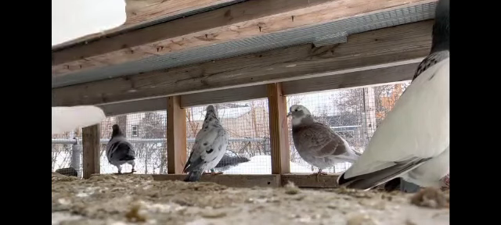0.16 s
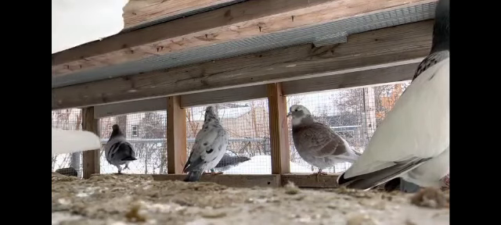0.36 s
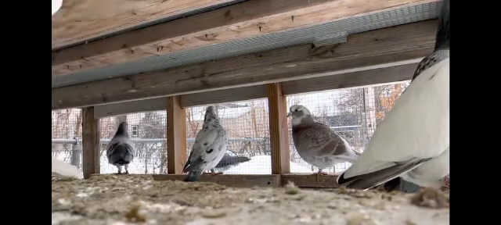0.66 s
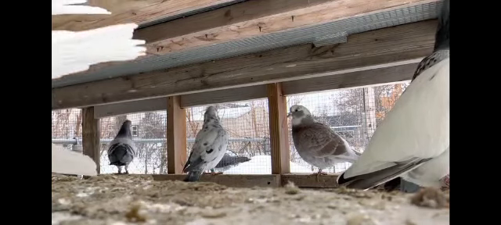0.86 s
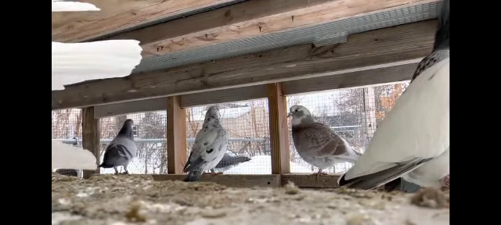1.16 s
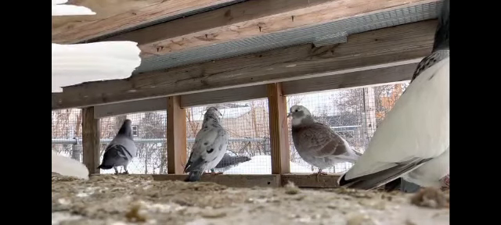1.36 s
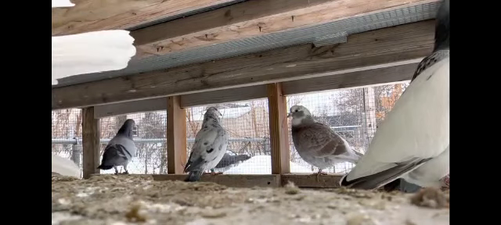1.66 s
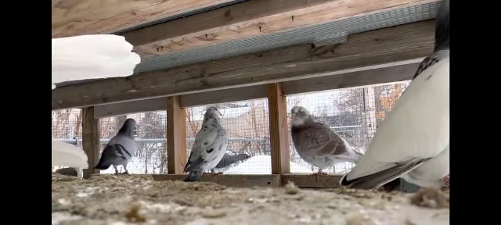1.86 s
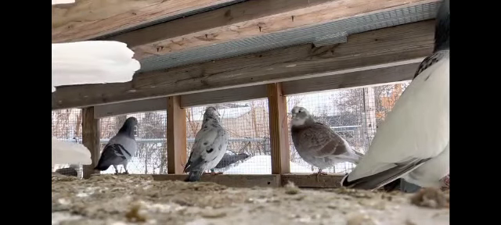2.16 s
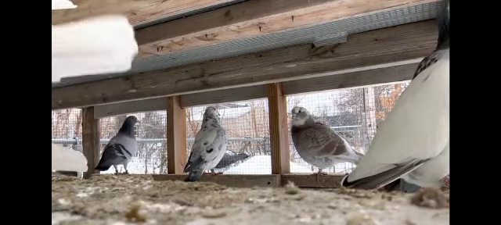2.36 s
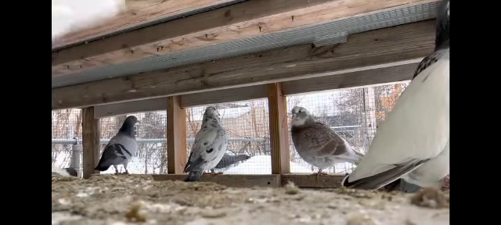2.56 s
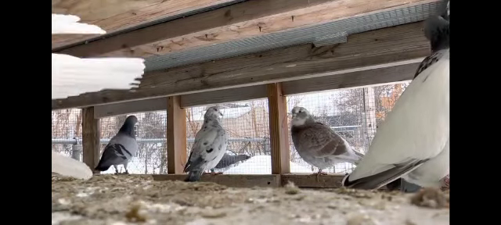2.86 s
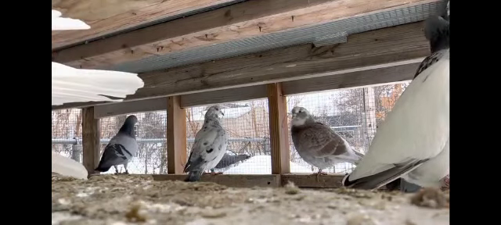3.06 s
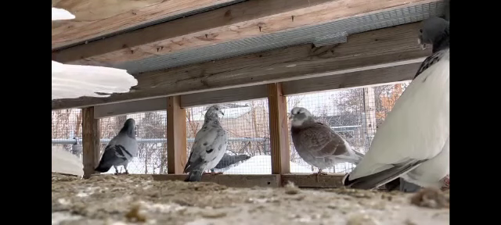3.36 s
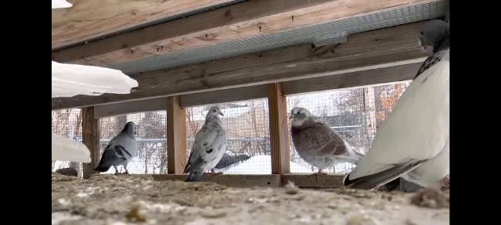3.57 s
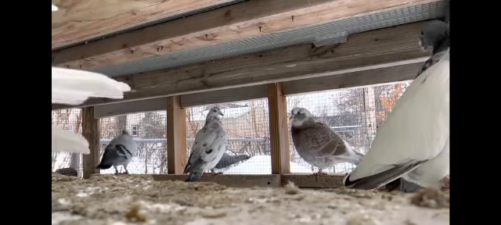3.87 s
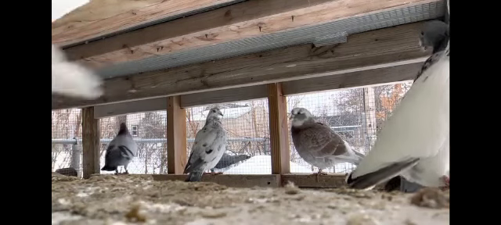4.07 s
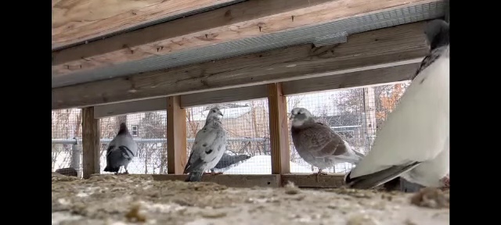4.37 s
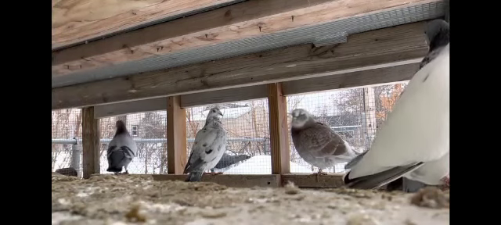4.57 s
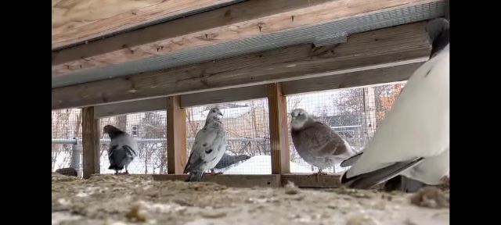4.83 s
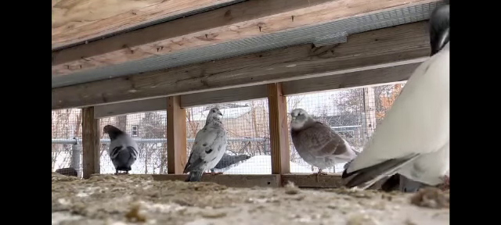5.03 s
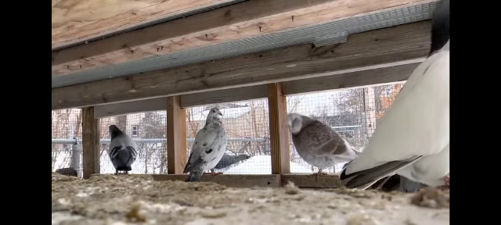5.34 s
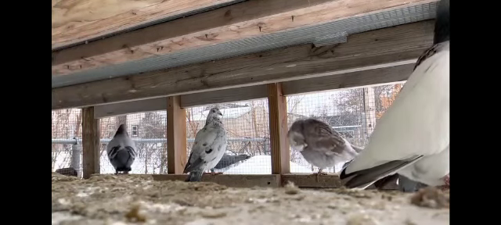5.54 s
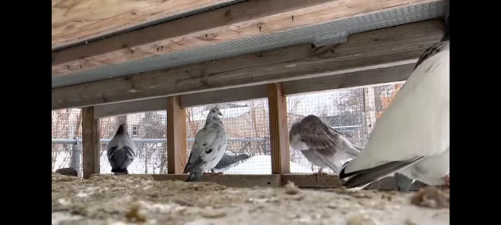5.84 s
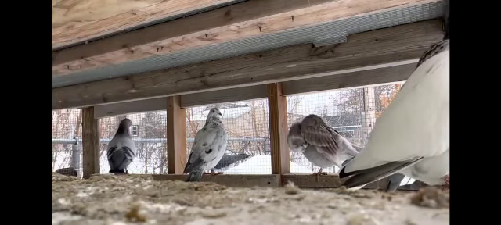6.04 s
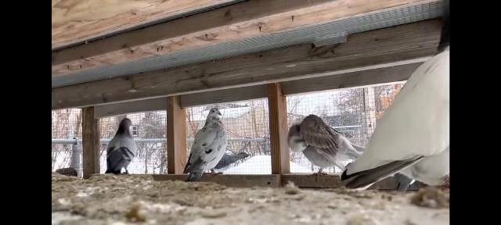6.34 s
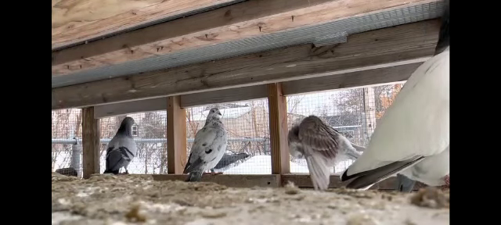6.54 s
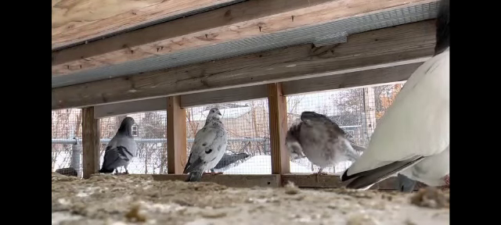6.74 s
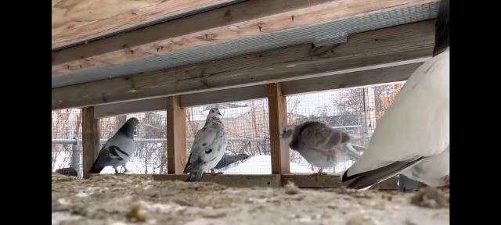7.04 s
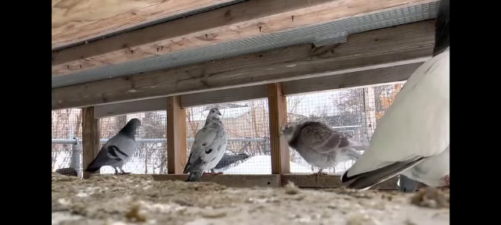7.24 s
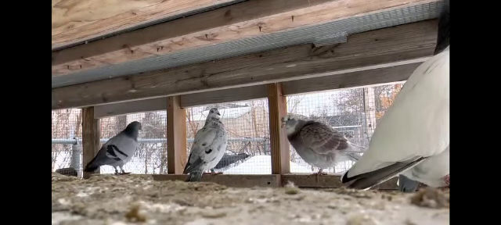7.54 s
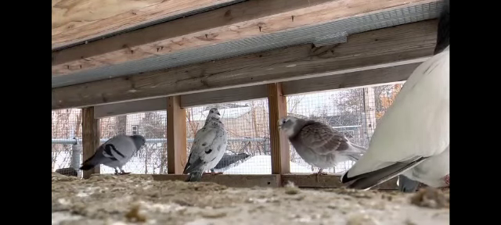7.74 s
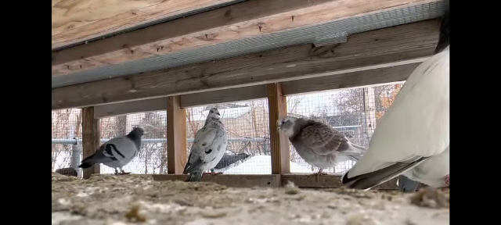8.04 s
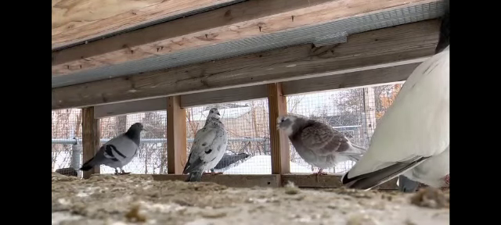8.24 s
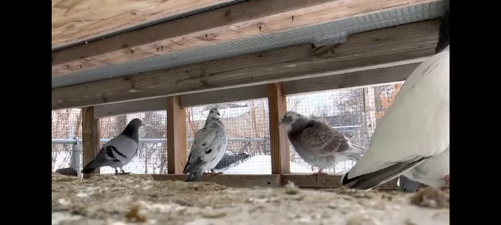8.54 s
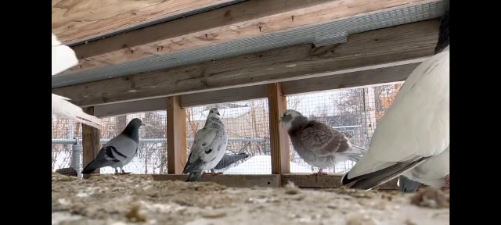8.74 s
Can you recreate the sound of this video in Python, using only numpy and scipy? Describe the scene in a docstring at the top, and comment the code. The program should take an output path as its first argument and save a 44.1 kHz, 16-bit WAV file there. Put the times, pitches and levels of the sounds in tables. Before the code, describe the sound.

Several pigeons murmur at close range, almost pure-toned hoots and warbling coos overlapping with low grunts. The calls thin out, birds land with two loud woody thumps, and wings shake in a rapid soft flutter. Sparse pecks, scratching claws and dry feather rustle follow, then a late hoot and coo with soft thuds. The room is short and woody, with a faint low outdoor rumble.

```python
"""Pigeons coo in a low wooden loft: near-pure gliding notes, short hoots, rough grunts and a low growl.
Each voice is a gliding sine with faint overtones; the growl is a train of slaps that rings the throat.
Close to the microphone, noise bursts make birds shuffle, shake their feathers, peck and scratch.
Twice one lands hard on the floor boards, which ring in decaying modes.
Wings push draughts at the microphone, and a faint outdoor rumble comes in through the wire mesh."""
import sys
import numpy as np
from scipy import signal
from scipy.fft import rfft, irfft, next_fast_len
from scipy.io import wavfile
from scipy.ndimage import uniform_filter1d, map_coordinates

SR = 44100
rng = np.random.default_rng(int(sys.argv[2]) if len(sys.argv) > 2 else 0)


def put_to_file(sound):
    """Save the sound as 16-bit audio at rate SR, in the file named by the first command-line argument."""
    columns = np.atleast_2d(sound).T  # one column per channel
    safe = np.clip(columns, -1, 1)
    whole_steps = np.round(safe * 32767)
    wavfile.write(sys.argv[1], SR, whole_steps.astype(np.int16))


N = 392490

# colour of feather hiss and of claw ticks on dry litter: frequency_hz, relative_level_db
VANES = [(760, -45.5), (1300, -4), (1410, -7), (2380, -2.5), (2590, -7), (4320, -6), (6100, -7.5),
         (7140, -5.5), (8180, -11), (10300, -3.5), (11500, -15.5), (14700, -12), (15800, -29)]


def amp(db):
    """Decibels to gain."""
    return 10 ** (np.asarray(db) / 20)


def unit(x):
    """Scale to rms 1."""
    return x / np.sqrt(np.mean(x ** 2) + 1e-20)


def along(points, hz):
    """(Hz, value) points read on a log axis."""
    f, v = np.transpose(points)
    return np.interp(np.log(hz + 1), np.log(f + 1), v)


def curves(rows, t):
    """Each column after the time, read at the times t."""
    s, *cols = np.transpose(rows)
    return [np.interp(t, s, c) for c in cols]


def wobble(rate, size):
    """A smooth random curve, rate knots a second."""
    knots = rng.standard_normal(int(size * rate / SR) + 4)
    return map_coordinates(knots, [np.arange(size) * rate / SR])


def noise(spectrum, size):
    """Coloured noise of rms 1."""
    m = next_fast_len(size + 8192)
    colour = amp(along(spectrum, np.fft.rfftfreq(m, 1 / SR)))
    return unit(irfft(rfft(rng.standard_normal(m)) * colour, m)[:size])


def add(out, s, sound):
    """Mix a sound in at time s."""
    start = max(0, round(s * SR))
    part = out[start:start + len(sound)]
    part += sound[:len(part)]


def dying(t, t60, rise):
    """A soft start and an exponential decay."""
    return amp(-60 * t / t60) * (1 - np.exp(-t / rise)) ** 2


def gesture(s, hold, db, rise, fall):
    """Gain of one movement: it rises to its level at time s, holds and falls away (slopes in dB per s)."""
    t = np.arange(N) / SR - s
    return amp(db - rise * np.maximum(-t, 0) - fall * np.maximum(t - hold, 0))


def cooing():
    """Full coos and the small notes between them; in low grunts the crop lifts the second harmonic."""
    # soft murmurs between the coos: start_s, length_s, first_pitch_hz, last_pitch_hz, level_db, roughness
    murmurs = [(.22, 0.055, 409, 360, -44.5, 0.46), (.3, 0.057, 377, 400, -44, 0.3),
               (.515, 0.04, 478, 447, -41.5, .4), (.64, 0.1, 307, 284, -40.5, 0.3),
               (1.02, 0.17, 388.5, 402, -46.5, 0.6), (1.62, 0.073, 489, 458, -39, 0.28),
               (6.915, .095, 229.6, 324, -41.5, 0.33), (6.945, 0.053, 367, 420, -43.5, .5),
               (7.16, .11, 547, 490, -55.5, 0.07)]
    # low throaty notes: start_s, length_s, first_pitch_hz, last_pitch_hz, level_db, roughness
    grunts = [(0, .06, 215, 237, -46, 0.54), (2.415, .05, 204, 195, -42.5, 0.54),
              (2.505, 0.089, 187, 192, -46.5, 0.1), (2.555, 0.049, 206, 231, -45, 0.54),
              (3.06, 0.031, 246, 165, -47.5, 0.33), (3.855, 0.049, 211, 191, -44.5, 0.22),
              (3.975, 0.079, 196, 204.4, -47, 0.42), (6.48, 0.19, 233.3, 226, -61, 0.2),
              (6.875, 0.053, 189.6, 241, -53, 0.54), (6.945, 0.072, 249.4, 266, -47, 0.4),
              (7.485, 0.061, 144, 130, -47.5, 0.6)]
    # thin rising squeaks: start_s, length_s, first_pitch_hz, last_pitch_hz, level_db, roughness
    squeaks = [(.04, 0.07, 560, 818, -52, 0.65), (.32, 0.098, 546, 745, -47, 0.62),
               (2.475, 0.049, 504, 565, -49.5, 0.54), (6.97, 0.13, 484, 850, -57, 0.25)]
    small_notes = slides(murmurs, overtones_db=[-30])
    small_notes = small_notes + slides(grunts, overtones_db=[-4, -18])
    small_notes = small_notes + slides(squeaks, overtones_db=[-25])
    return coos() + small_notes


def coos():
    """A coo swells, glides down, warbles and pushes, then breaks into a low hoarse tail; the crop keeps it pure."""
    # start_s, time_to_break_s, pitch_hz, glide_s, level_db, swell_s, warble_hz, warble_depth_db,
    # tail_s, last_push_pitch_lift_share (may be negative), roughness
    coo_rows = [(0.306, .232, 340, 0.093, -32.5, 0.037, 13.1, 0.5, .03, 0.2, 0.33),
                (0.869, 0.14, 393.5, 0.022, -27, 0.022, 13.4, 2.3, 0.12, -0.021, 0.13),
                (1.214, 0.23, 390.6, 0.0064, -34.5, 0.023, 15, 0.5, .05, -0.036, 0.37),
                (1.413, .191, 322.7, .152, -29.5, 0.053, 11, 3, .04, 0.069, 0.14),
                (2.127, .198, 394, 0.0346, -27, 0.042, 15.7, 3, 0.0815, -.07, 0.07),
                (2.898, .171, 388, 0.0278, -31, 0.0094, 10.05, 3, 0.027, -.083, 0.2),
                (4.353, 0.17, 346.7, 0.064, -29.9, .025, 12.7, 2.5, 0.024, 0.098, 0.09),
                (7.215, 0.24, 367.7, 0.094, -34, 0.068, 11.7, 0.8, 0.087, 0.26, 0.16)]
    scoop, swell_db = 0.4, 20.5  # starts this share above its pitch and this much below its level
    glide_power = 2.7  # the pitch lingers on top before it slides down
    warble_bend = .022  # share by which the pulsing crop bends the pitch
    last_push_s, push_width_s = .0125, 0.02  # the last push comes just before the break
    break_s, break_drop, break_db = 0.01, 0.29, 11.5  # how fast, share of pitch lost, level lost
    slack_rough = .2  # extra roughness while the membrane is slack, at the start and after the break
    out = np.zeros(N)
    for s, length, hz, glide, db, swell, warble_hz, warble_db, tail, lift, rough in coo_rows:
        t = np.arange(round((length + tail) * SR)) / SR
        filling = np.exp(-t / swell)  # falls from 1 to 0 as the voice swells
        broken = .5 + .5 * np.tanh((t - length) / break_s)  # goes from 0 to 1 at the break
        since_push = t - length + last_push_s
        warble = np.cos(2 * np.pi * warble_hz * since_push) * (1 - broken)
        pitch = hz * (1 + scoop * np.exp(-(t / glide) ** glide_power))
        pitch = pitch * (1 + lift * np.exp(-(since_push / push_width_s) ** 2))
        pitch = pitch * (1 + warble_bend * warble) * (1 - break_drop * broken)
        level = db - swell_db * filling + warble_db * warble - break_db * broken
        hoarse = rough + slack_rough * np.maximum(filling, broken)
        add(out, s, note(pitch, level, hoarse, overtones_db=[-38, -50]))
    return out


def slides(rows, overtones_db, edge_db=5.5):
    """Short notes on a straight slide of pitch, weaker by edge_db at their ends than in the middle."""
    out = np.zeros(N)
    for s, length, first_hz, last_hz, db, rough in rows:
        u = np.linspace(-1, 1, round(length * SR))
        pitch = np.linspace(first_hz, last_hz, len(u))
        add(out, s, note(pitch, db - edge_db * u ** 2, rough, overtones_db))
    return out


def note(pitch, db, rough, overtones_db, flutter_hz=130, jitter=0.13):
    """One syrinx note; a hoarse membrane flutters in strength and pitch."""
    t = np.arange(len(pitch)) / SR
    shaken_pitch = pitch * (1 + jitter * rough * wobble(flutter_hz, SR)[:len(t)])
    phase = 2 * np.pi * np.cumsum(shaken_pitch) / SR
    tone = np.sin(phase)
    for k, level in enumerate(overtones_db, 2):
        tone = tone + amp(level) * np.sin(k * phase)
    flutter = (1 + rough * wobble(flutter_hz, SR)[:len(t)]) / np.sqrt(1 + rough ** 2)
    from_edge = np.minimum(t, t[-1] - t)
    fade = np.sin(np.pi / 2 * np.clip(from_edge / .014, 0, 1)) ** 2
    return np.sqrt(2) * amp(db) * fade * flutter * tone


def hoots(gain_db=-1.0, scoop=0.23, settle_s=0.0023, overtone_db=-30):
    """A puff through the syrinx swells and dies while its pitch drops into place."""
    # time_s, level_db (before gain_db), settled_pitch_hz, swell_s
    hoot_rows = [(0.198, -23, 443, 0.007), (0.464, -25, 338, 0.0028), (0.506, -22.5, 373, 0.0054),
                 (0.602, -24, 423, 0.0064), (0.705, -20.5, 372.6, 0.0092), (1.196, -24, 353, 0.0091),
                 (1.35, -25, 429.5, 0.0096), (1.693, -33.5, 397, 0.015), (1.748, -20, 390.6, 0.0086),
                 (1.777, -29, 293, 0.0052), (1.846, -31, 449, 0.0057), (1.945, -18.5, 384.3, 0.009),
                 (2.614, -31, 320, 0.0075), (2.629, -32, 379, 0.0069), (2.781, -23, 428, 0.0073),
                 (2.816, -30, 357, 0.0041), (4.048, -33, 261, 0.011), (4.214, -31.5, 457, 0.012),
                 (4.227, -25, 377, 0.0094), (4.25, -29, 380, 0.0085), (7.089, -25, 406, 0.006)]
    out, t = np.zeros(N), np.arange(SR // 8) / SR
    for s, db, hz, swell in hoot_rows:
        u = t / max(swell, .002)
        puff = (u * np.exp(1 - u)) ** 2
        phase = 2 * np.pi * np.cumsum(hz * (1 + scoop * np.exp(-t / settle_s))) / SR
        tone = np.sin(phase) + amp(overtone_db) * np.sin(2 * phase)
        add(out, s - .002, amp(db + gain_db) * puff * tone)
    return out


def growl(pulse_hz=140, opening=0.47, closed_db=-42):
    """Slack membranes slap at an uneven rate and ring the throat; with effort the upper resonances open."""
    # pushes of a growl under the cooing: start_s, hold_s, level_db (ahead of the neck feathers)
    push_rows = [(.32, 0.45, -47.5), (1.03, .06, -45), (1.11, 0.022, -41), (1.278, .02, -34),
                 (1.342, .08, -39.5), (1.456, .015, -33.5), (1.517, 0.049, -34)]
    # resonances of the growling throat: frequency_hz, width_hz, relative_level_db
    throat = [(129, 29, -0.5), (276, 74, 4.5), (415, 111, 5), (728, 43, 1.5), (970, 120, -9)]
    clock = np.cumsum(pulse_hz * np.exp(.09 * wobble(70, N))) / SR
    slaps = np.diff(np.floor(clock), prepend=0) * amp(2.5 * rng.standard_normal(N))
    pushes = [gesture(*row, rise=699.5, fall=187) for row in push_rows]
    effort_db = 20 * np.log10(np.max(pushes, axis=0) + 1e-9)
    f, spectrum = np.fft.rfftfreq(N, 1 / SR), rfft(slaps)
    rings = []
    for k, (hz, width, gain_db) in enumerate(throat):
        resonance = 1j * f * width / (hz * hz - f * f + 1j * f * width)
        rings.append(irfft(spectrum * (-1) ** k * amp(gain_db) * resonance, N))  # signs alternate
    crop, beak = sum(rings[:3]), sum(rings[3:])
    voice = (crop + beak * amp(opening * (effort_db - closed_db))) / np.std(crop + beak)
    muffle = signal.cheby1(8, 1, 1250, fs=SR, output="sos")  # neck feathers soak up the rest
    return signal.sosfilt(muffle, voice * amp(effort_db))


def feathers(stroke_db=-3, stroke_width_s=0.0047, catch_db=-6):
    """Barbs slide with a grainy hiss and catch now and then; a shake flicks them in quick strokes."""
    # a bird ruffles or preens: start_s, hold_s, level_db, rise_db_per_s, fall_db_per_s
    ruffles = [(0.014, 0.51, -77, 300, 57), (0.556, 0.2, -57, 275, 221), (0.909, 0.19, -75, 202, 32.5),
               (1.743, 0.031, -73.5, 403, 155), (2.493, .24, -60.5, 420, 210),
               (4.245, 0.23, -56.5, 148, 89.5), (5.082, 0.045, -76, 102, 54), (5.542, .07, -69.5, 96, 62),
               (5.82, 0.52, -72.5, 76, 80), (6.612, 0.2, -67.5, 115, 498), (8.16, 0.019, -70, 128, 350)]
    # quick feather strokes: time_s, level_db (before stroke_db)
    strokes = [(4.2694, -35.5), (4.333, -32), (4.402, -32.5), (4.4693, -33.5)]
    # colour of a flicked feather: frequency_hz, relative_level_db
    flick = [(590, -43), (1000, -16), (1980, -16.5), (3170, -10), (3440, -12.5), (5270, -12.5),
             (6130, -19.5), (7120, 0), (8090, -15), (10200, -1.5), (11400, -11.5), (14700, -11.5),
             (15800, -19)]
    level = amp(-87.5)  # the whole flock's feathers never quite rest
    for row in ruffles:
        level = np.maximum(level, gesture(*row))
    slide = unit(amp(2.1 * wobble(700, N) + 2.0 * wobble(45, N)))
    catches = (rng.random(N) < 120 / SR) * rng.random(N)  # about 120 a second
    catches = unit(signal.lfilter([1], [1, -np.exp(-1 / (.001 * SR))], catches))  # each dies in about 1 ms
    out = level * noise(VANES, N) * unit(slide + amp(catch_db) * catches)
    t = np.arange(-SR // 25, SR // 25) / SR
    for s, db in strokes:
        swish = np.exp(-.5 * ((t - .005) / stroke_width_s) ** 2)
        add(out, s + t[0], amp(db + stroke_db) * swish * noise(flick, len(t)))
    return out


def knocks(crack_db=-4, thump_db=-1, wood_db=-1, ring_db=-6, crack_t60=0.23, wood_t60=0.27, thump_t60=0.35, light=.5):
    """Feet hit the boards: a gritty crack, ringing wood and a floor thump; light taps die sooner."""
    # blows: time_s, crack_db, thump_db, wood_db (before the gains above), ring_time_share
    blows = [(3.252, -26, -20.5, -21.5, 0.9), (3.372, -38, -44, -36, .9), (3.5664, -23, -22.5, -19, 0.97),
             (5.266, -42, -49, -44.5, 0.83), (8.7241, -79, -48.5, -50.5, 0.75)]
    # modes of the floor boards: frequency_hz, relative_level_db, t60_s (before the ring share)
    boards = [(80.1, -3, 0.87), (126.6, -5, 0.54), (187, 6, 0.19), (277.5, 8.5, 0.18), (376, -11, 0.031),
              (375, 4, 0.052), (500, -1, 0.21), (524.5, 7, 0.27), (576, -8.5, 0.4), (725, -7, 0.3),
              (905, -6, 0.19), (948, -0.5, 0.21), (1068, -8, 0.49), (1147, -14.5, 0.42), (1278, -7, 0.29)]
    # colours of crack, ringing wood and thump: frequency_hz, relative_level_db
    crack_colour = [(710, -20.5), (1200, -3.5), (1410, -11.5), (2080, -8.5), (2240, -16), (3070, -8.5),
                    (3450, -17.5), (4620, -19.5), (8730, -33), (10700, -27), (11900, -37), (14500, -47),
                    (15800, -50.5)]
    wood_colour = [(200, -41), (350, -10), (550, 1.5), (680, -8.5), (950, 1.5), (1250, -3), (1700, -13.5),
                   (3000, -42)]
    thump_colour = [(25, -20), (50, -18), (95, 2.5), (150, -17.5), (200, -5.5), (290, -7), (400, -7),
                    (800, -62)]
    out, t = np.zeros(N), np.arange(SR // 2) / SR
    crack_rise = .004  # rise time of the crack, in time stretched by length
    for s, crack, thump, wood, ring in blows:
        length = max(ring, .2) * np.interp(wood, [-45, -25], [light, 1])
        u = t / length
        blow = amp(crack + crack_db) * noise(crack_colour, len(t)) * dying(u, crack_t60, rise=crack_rise)
        blow += amp(wood + wood_db) * noise(wood_colour, len(t)) * dying(u, wood_t60, rise=0.0055)
        blow += amp(thump + thump_db) * noise(thump_colour, len(t)) * dying(u, thump_t60, rise=0.0026)
        for hz, db, t60 in boards:
            drive = thump if hz < 330 else wood
            swing = np.sin(2 * np.pi * (hz * t + rng.random()))
            spot_db = rng.normal(0, 2)  # where the foot lands
            blow += amp(drive + ring_db + db + spot_db) * swing * dying(u, t60, rise=0.0068)
        chatter = amp(0.85 * wobble(150, len(t)))  # loose boards
        add(out, s - 0.0045 * length, blow * chatter)
    return out


def pecks(tap_db=-1, tap_t60=0.044, plank_db=-6, plank_t60=0.25):
    """A beak strikes a plank: a short bright tap over a hollow after-ring."""
    # sharp beak taps on wood: time_s, level_db (before tap_db and plank_db)
    peck_rows = [(0.168, -42), (5.021, -42.5), (5.26, -47.5), (6.11, -32), (6.626, -46.5)]
    # colour of the tap: frequency_hz, relative_level_db
    tap_colour = [(150, -22), (250, -10), (588, -10), (703, -14), (1100, -2.5), (1700, -23), (1950, -19),
                  (2630, -41), (3200, -22), (3950, -57), (4650, -37), (9000, -52), (11700, -82),
                  (19800, -120)]
    # colour of the plank: frequency_hz, relative_level_db
    hollow = [(40, -27), (90, -11), (125, 2.5), (220, -1.0), (320, -7.5), (450, -7), (900, -37), (3000, -120)]
    out, t = np.zeros(N), np.arange(SR // 3) / SR
    for s, db in peck_rows:
        tap = amp(tap_db) * noise(tap_colour, len(t)) * dying(t, tap_t60, rise=0.00047)
        plank = amp(plank_db) * noise(hollow, len(t)) * dying(t, plank_t60, rise=0.00025)
        add(out, s - .001, amp(db) * (tap + plank))
    return out


def soft_thuds(thud_db=-1, t60=0.17):
    """Steps and wing strokes give soft thuds: low noise with a gentle start and a quick decay."""
    # soft low thuds of steps and wing strokes: time_s, level_db (before thud_db)
    thuds = [(1.284, -28), (3.69, -31.5), (3.831, -32.5), (4.268, -34.5), (4.333, -33.5), (4.398, -36),
             (4.468, -37.5), (5.386, -35.5), (7.334, -28.5), (7.383, -37.5), (7.471, -29.5), (7.606, -37),
             (8.818, -52)]
    # colour of a thud: frequency_hz, relative_level_db
    low_colour = [(25, -23.5), (55, -8.5), (80, 1), (130, -9.0), (250, -17.0), (600, -35.5), (3000, -120)]
    out, t = np.zeros(N), np.arange(SR // 2) / SR
    for s, db in thuds:
        add(out, s, amp(db + thud_db) * noise(low_colour, len(t)) * dying(t, t60, rise=0.0092))
    return out


def claws(tick_db=-1, tick_t60=0.047, scrape_db=-1, scrape_t60=0.16, grit_db=1.0):
    """Claws tick on dry litter, or drag over the boards in gritty scrapes."""
    # claw ticks: time_s, level_db (before tick_db)
    ticks = [(0.0351, -51.5), (0.166, -53), (0.862, -64), (0.986, -62.5), (1.1023, -58), (1.5356, -66),
             (1.8068, -65), (2.3752, -66), (2.4607, -59.5), (2.648, -54.5), (2.6891, -52), (5.1507, -73),
             (5.4884, -64), (5.945, -60.5), (6.045, -57.5), (6.7075, -57.5), (7.227, -67.5), (7.4699, -64)]
    # claws dragged over the boards: time_s, level_db (before scrape_db)
    scrapes = [(0.165, -52.5), (3.3666, -40.5), (3.6687, -41.5), (4.0161, -56.5), (5.2655, -48),
               (5.6162, -44), (5.7309, -37.5), (6.912, -47), (8.6616, -43), (8.7171, -34)]
    # colour of a scrape: frequency_hz, relative_level_db
    scratch = [(530, -29.5), (900, -5), (1170, 3), (1440, -11), (2710, -9), (2910, -4), (4080, -11),
               (5000, -5.5), (5440, -12.5), (6200, -11.5), (6990, -6.5), (8570, -20), (14200, -24.5),
               (15800, -30.5)]
    out, t = np.zeros(N), np.arange(SR // 3) / SR
    for s, db in ticks:
        add(out, s, amp(db + tick_db - 60 * t / tick_t60) * noise(VANES, len(t)))
    for s, db in scrapes:
        grit = amp(db + scrape_db + grit_db * wobble(400, len(t)))
        add(out, s - .006, grit * noise(scratch, len(t)) * dying(t, scrape_t60, rise=0.0071))
    return out


def patchy(x, depth_db, size=5):
    """Give a noise short-lived patches of colour."""
    z = signal.stft(x, nperseg=512)[2]
    field = rng.standard_normal(z.shape)
    field = uniform_filter1d(uniform_filter1d(field, size, 0), size, 1)
    gain = amp(depth_db * unit(field))
    return signal.istft(z * unit(gain), nperseg=512)[1][:len(x)]


def shuffling():
    """Moving birds scuff the boards and push soft gusts of air; the growling bird's breath rasps in the same
    way."""
    # a bird shifts on the boards, or (the row at 1.279 s) the growling bird's breath rasps: start_s, hold_s,
    # scuffing_db, pushed_air_db
    shuffles = [(0.02, 0.54, -60.5, -49), (0.69, 0.56, -56, -47), (1.279, .26, -53, -46),
                (2.543, 0.12, -63, -52.5), (3.4, 0.75, -63.5, -52.5), (4.302, 0.18, -57.5, -53),
                (5.556, 0.24, -59, -61), (6.62, 0.14, -63, -58), (8.403, 0.026, -76, -58.5),
                (8.743, 0.052, -56, -55)]
    # the flock's background stir, lower by the end: time_s, scuffing_db, pushed_air_db
    stir = [(0, -63, -57.5), (4, -66.5, -55.5), (5, -69, -61.5), (8.9, -72.5, -65.5)]
    # colours of scuffing and of pushed air: frequency_hz, relative_level_db
    scuff_colour = [(320, -19.5), (550, -10.5), (699, -4), (811, -6.5), (984, -9.5), (1120, -10),
                    (1790, -26.5), (2790, -26.5), (3790, -36.5), (5000, -47.5), (6500, -90), (11000, -120)]
    air_colour = [(20, -18), (45, -2.5), (80, 2.5), (130, -3), (200, -6.5), (350, -5.5), (600, -18),
                  (1000, -52.5)]
    scuff, air = amp(curves(stir, np.arange(N) / SR))
    for s, hold, feet_db, gust_db in shuffles:
        move = gesture(s, hold, 0, rise=154, fall=87)
        scuff = np.maximum(scuff, amp(feet_db) * move)
        air = np.maximum(air, amp(gust_db) * move)
    scuffs = scuff * amp(3.1 * wobble(60, N)) * noise(scuff_colour, N)
    gusts = air * amp(3.7 * wobble(25, N)) * noise(air_colour, N)
    return scuffs + gusts


def draughts(rise=200, fall=90):
    """Air moved by wings reaches the microphone as a soft, very low rumble."""
    # pushes on the microphone: start_s, hold_s, level_db
    pushes = [(3.375, .35, -49), (4.287, 0.23, -49.5), (7.466, .08, -49), (8.8, 0.084, -52)]
    # colour of a draught: frequency_hz, relative_level_db
    draught_colour = [(20, -26), (42, -1.5), (60, -1), (100, -18.5), (300, -67.5), (1000, -120)]
    return sum(gesture(*row, rise, fall) for row in pushes) * noise(draught_colour, N)


def outdoors(level_db=-65.0):
    """A faint steady rumble of coloured noise comes in through the wire mesh."""
    # colour of the outdoors: frequency_hz, relative_level_db
    outside = [(13, -38.5), (25, 4), (70, 0.5), (173, -13), (385, -17.5), (535, -28.5), (981, -12.5),
               (1480, -28.5), (2950, -32), (3380, -52.5), (4710, -31.5), (6920, -39), (8160, -41.5),
               (14200, -44.5), (15800, -55)]
    return amp(level_db) * noise(outside, N)


def loft(x):
    """The low wooden room answers briefly, 4 ms late, with a noise tail that decays by frequency."""
    # decay of the room: frequency_hz, t60_s
    decay = [(100, .35), (500, 0.19), (2000, 0.39), (7000, 0.27), (14000, 0.18)]
    hz, t, z = signal.stft(rng.standard_normal(SR // 2), SR, nperseg=256)
    fading = amp(-60 * t / along(decay, hz)[:, None])
    tail = signal.istft(z * fading, SR, nperseg=256)[1]
    answer = np.pad(tail / np.linalg.norm(tail), (SR // 250, 0))
    return signal.fftconvolve(x, answer)[:N]


def scene():
    """Close voices are nearly dry; feet and feathers stir the room more."""
    voices = cooing() + hoots() + growl()
    rustle = patchy(feathers() + claws(), depth_db=3.2)
    movement = knocks() + pecks() + soft_thuds() + rustle
    room = loft(amp(-16.0) * voices + amp(-11) * movement)
    return (voices + movement + room + shuffling() + draughts() + outdoors())[None]


def record(dry, top_hz=15850):
    """The microphone chain passes nothing above its band limit."""
    m = next_fast_len(N + SR // 2)
    passed = np.fft.rfftfreq(m, 1 / SR) < top_hz
    return irfft(rfft(dry, m) * passed, m)[:, :N]


dry = scene()
out = record(dry)
put_to_file(out)
```